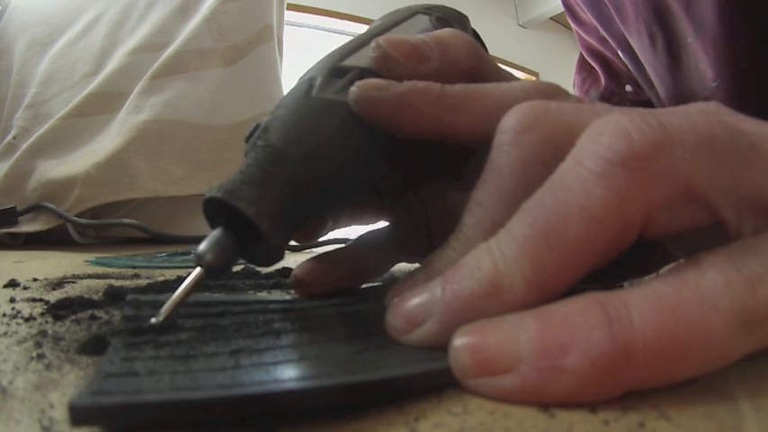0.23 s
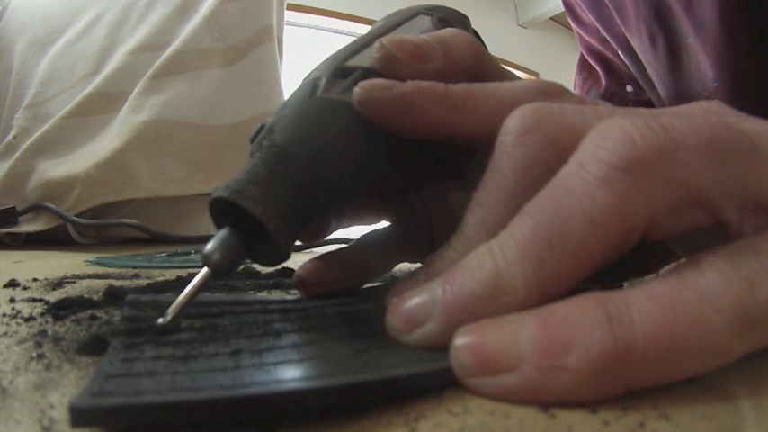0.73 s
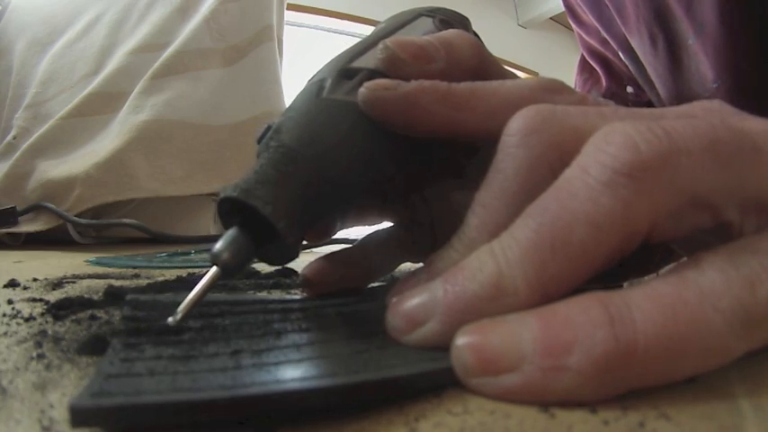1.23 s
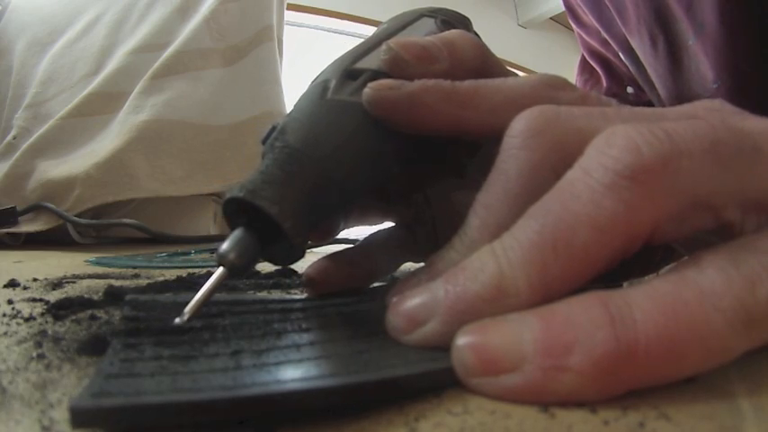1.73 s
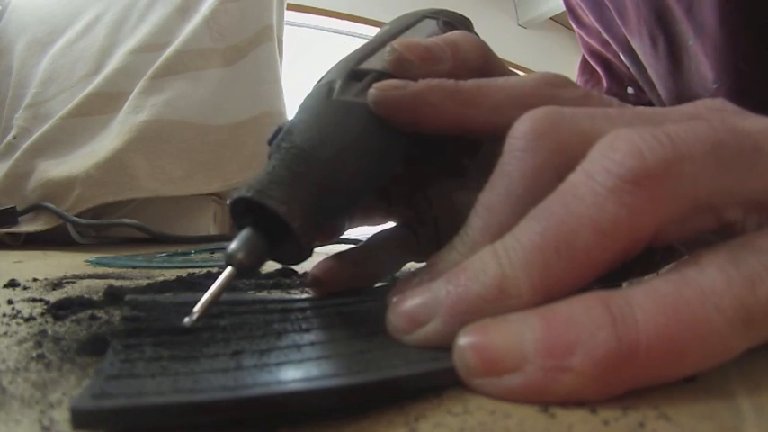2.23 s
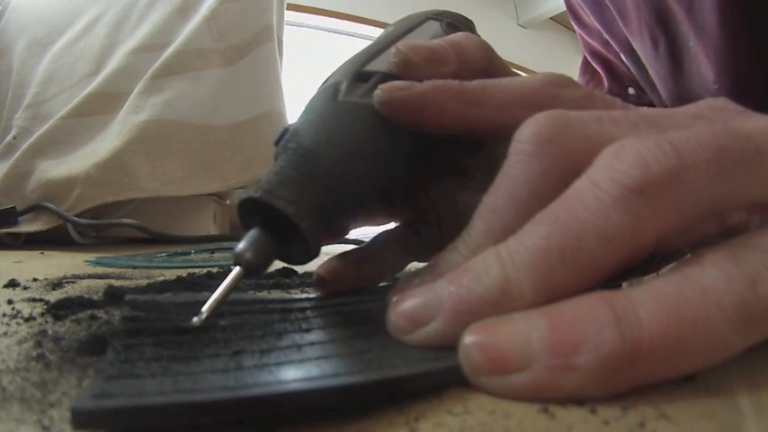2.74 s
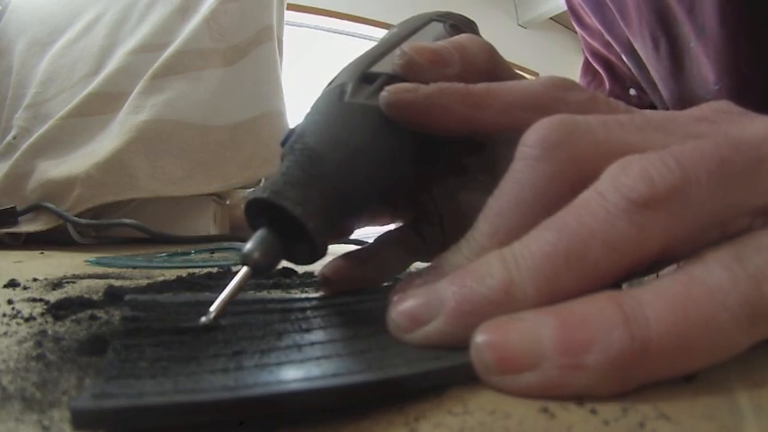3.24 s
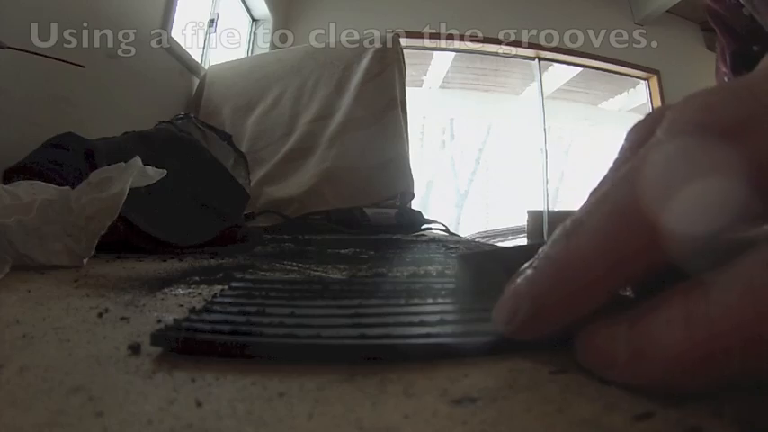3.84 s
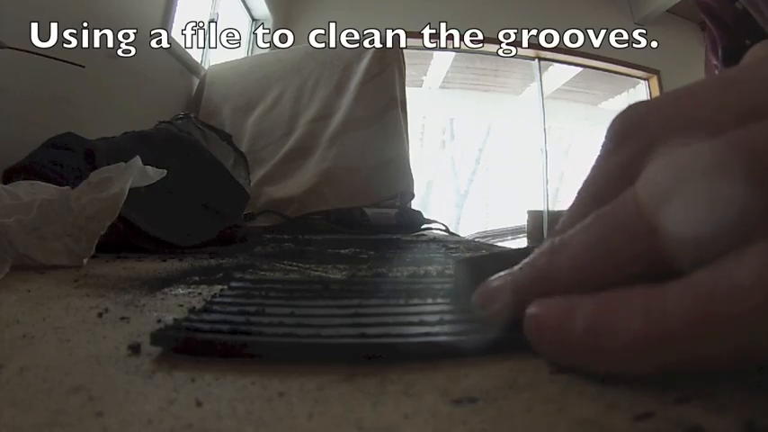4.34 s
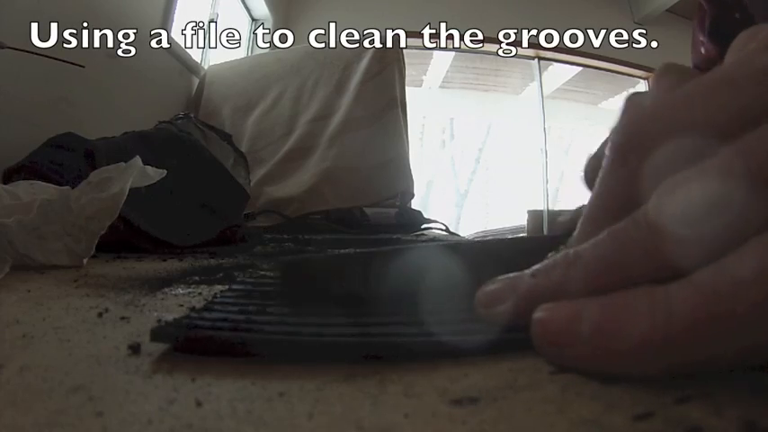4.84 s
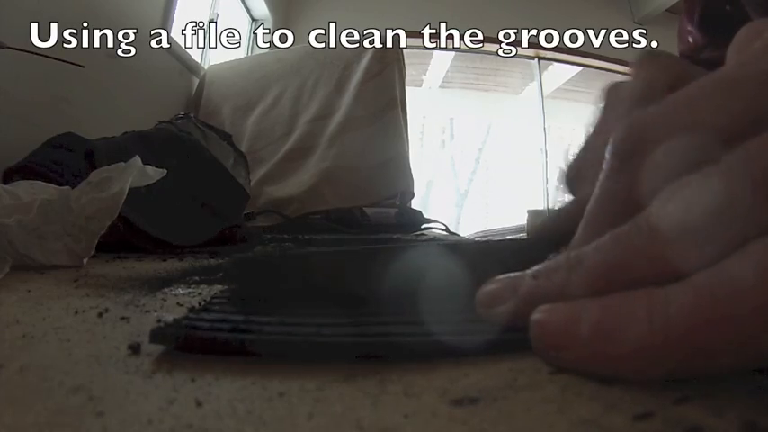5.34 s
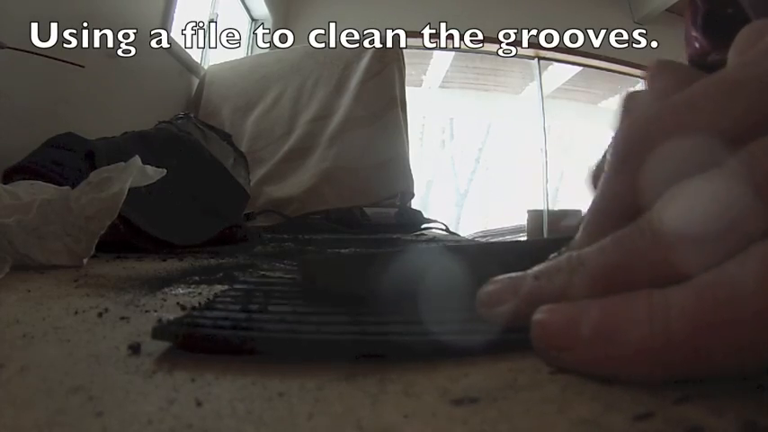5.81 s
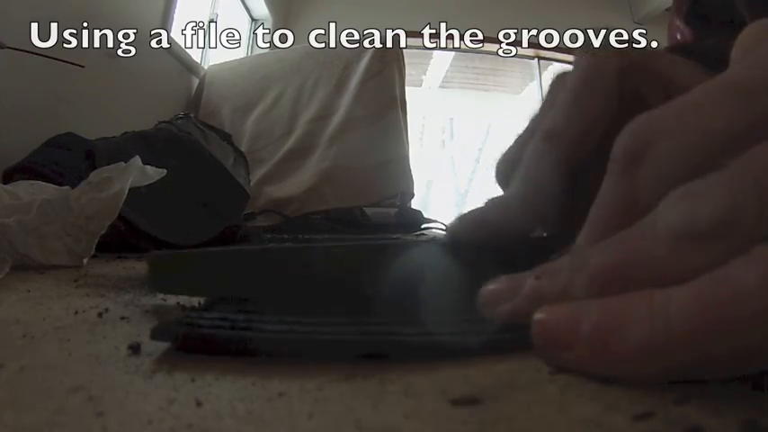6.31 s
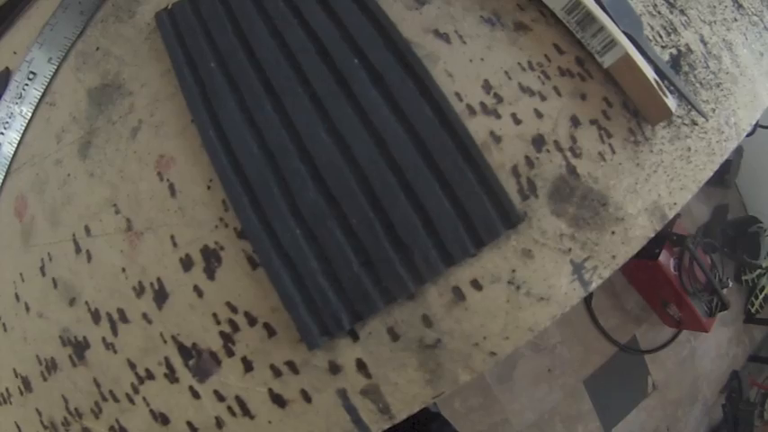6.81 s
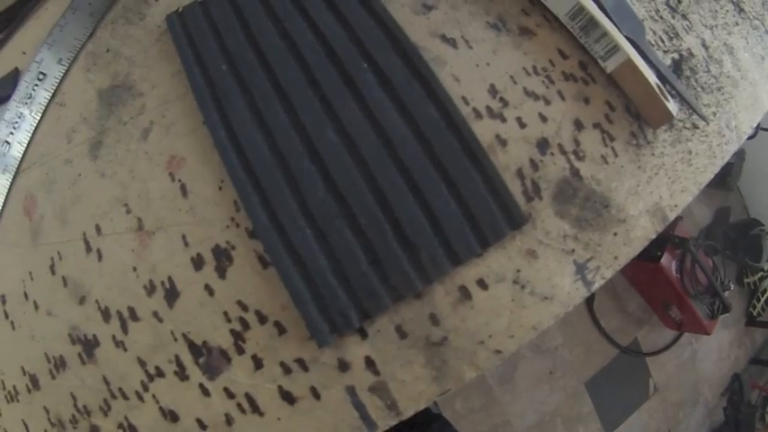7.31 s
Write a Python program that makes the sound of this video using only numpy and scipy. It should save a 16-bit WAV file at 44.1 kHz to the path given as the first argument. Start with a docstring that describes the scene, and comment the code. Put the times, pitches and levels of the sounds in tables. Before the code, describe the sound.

Close up in a quiet workshop, a rotary tool whines steadily as its burr cuts into rubber, sagging a little in pitch as it presses harder. The whine drops away, and light ticks and finger rustles follow. Then a small file rasps back and forth in short, quick strokes that grow somewhat stronger, over dull bench bumps and rumble. The filing ends, leaving only faint room noise in mono.

```python
"""A mains-driven rotary tool grinds a groove in a rubber sheet on a bench, heard close and in mono.
Its shaft, armature slots and fan blades radiate tones that sink in pitch under load, over the noise
of air and burr. After a fade, a small steel file is set down and scrapes to and fro, its teeth
catching the rubber while the hands bump the bench. After another fade the quiet workshop remains."""
import sys
import numpy as np
from scipy import signal
from scipy.fft import rfft, irfft, next_fast_len
from scipy.io import wavfile
from scipy.ndimage import uniform_filter1d, map_coordinates

SR = 44100
rng = np.random.default_rng(int(sys.argv[2]) if len(sys.argv) > 2 else 0)


def unload_audio(sound):
    """Save the sound as a 16-bit wav file, at the path given as the first command line argument."""
    columns = np.transpose(np.atleast_2d(sound))
    # keep every value between -1 and 1, then stretch to whole-number steps
    steps = np.round(np.clip(columns, -1, 1) * 32767)
    wavfile.write(sys.argv[1], SR, steps.astype(np.int16))


N = 333440

# Noise spectra. Each row: frequency in Hz, relative spectral density in dB.
ROOM_SPECTRUM = [(12, -31), (20, 0.5), (59, -1.5), (87, -2), (112, -1.5), (217, -4.5), (1080, -12.5),
                 (4090, -20), (13100, -32.5), (15100, -39)]  # workshop air and hiss
SKIN_SPECTRUM = [(1500, -21), (3000, -6), (4200, 0), (5500, -15), (8000, -8.5), (15500, -23)]  # fingers on rubber
BENCH_SPECTRUM = [(12, -32), (20, 6), (49, 3), (144, -10), (250, -7.5), (320, -27), (550, -120)]  # the bench rumbling
DRUM_SPECTRUM = [(90, -17), (160, -3), (300, 1), (420, 4.5), (650, -27.5), (1500, -90)]  # the sheet drumming
RUBBER_SPECTRUM = [(150, -43), (400, -10), (550, 2.5), (800, 0.5), (1000, -6), (1180, 5), (1300, -7),
                   (1650, -12.5), (1900, -5.5), (2100, -7.5), (2500, -27), (4000, -37), (9000, -80)]  # the sheet scraped on the bench
CREAK_SPECTRUM = [(150, -20), (450, 0), (900, -2), (1400, -8), (3000, -37), (8000, -80)]  # the loaded sheet
GRIT_SPECTRUM = [(1200, -8.5), (2200, -2.5), (2900, -4.5), (3450, -1), (4100, -6), (4650, -3.5),
                 (5500, -9.5), (7240, -9), (11000, -19), (15300, -26)]  # teeth rasping
BITE_SPECTRUM = [(300, -0.5), (900, -1), (1600, 2), (2500, -12), (4500, -21), (8000, -35), (15300, -48)]  # teeth digging in
FAN_SPECTRUM = [(2200, -22.5), (3100, -0.5), (3400, -2.5), (3900, 2), (4500, -5), (5300, -4), (6600, 0.5),
                (7400, -4), (8000, -0.5), (8900, -2.5), (9600, -4.5), (10800, -11.5), (11800, -10.5),
                (15500, -19.5)]  # fan air
BURR_SPECTRUM = [(20, -37), (40, -26.5), (130, -19), (250, -21.5), (500, -15), (800, -11), (1050, -1.5),
                 (1250, -7), (1500, -10.5), (2000, -12), (2500, -13), (3000, -14), (4000, -30)]  # the burr cutting rubber
# Modes of vibration. Each row: frequency in Hz, relative level in dB, t60 in seconds.
SNAP_MODES = [(4320, -5, 0.0065), (7500, -17, .004), (11000, -3, 0.0033)]
SHEET_MODES = [(1000, -4, 0.014), (1560, -8.5, 0.0096)]
FILE_MODES = [(3620, 1.5, 0.031)]
# The file touches down and shifts. Each row: start in seconds, then snap, knock and ring in dB.
FILE_TICKS = [(3.8913, -26, -57, -57), (3.9227, -29, -29.5, -51.5), (4.042, -54, -40, -49),
              (4.0966, -55, -60.5, -61.5), (4.1454, -57, -51, -57), (4.1894, -56.5, -56, -63),
              (4.8994, -39, -36, -44), (5.1194, -43, -26, -54), (5.6585, -38.5, -34.5, -45),
              (5.796, -40.5, -33, -47.5)]
# A hand bumps the bench. Each row: start in seconds, level in dB.
HAND_BUMPS = [(3.9675, -33), (4.034, -36), (4.789, -25.5), (5.084, -28), (5.168, -36), (5.392, -25.5)]
# Fingers brush the sheet. Each row: start and length in seconds, bright and dull levels in dB.
FINGER_BRUSHES = [(3.885, .04, -49, -71), (3.932, 0.035, -64, -61), (4.07, 0.11, -70, -60),
                  (4.19, 0.11, -67, -66), (4.362, 0.11, -73, -50)]
# Push and pull in turn. Each row: start and end in seconds, fastest point as a share of the stroke,
# scrape and hiss in dB, top tooth rate in Hz, first bite in dB.
FILE_STROKES = [(4.396, 4.549, 0.39, -44.5, -52.5, 1100.0, -50), (4.532, 4.67, 0.7, -51, -53, 600.0, -50),
                (4.704, 4.836, 0.72, -39, -44.5, 900.0, -38),
                (4.864, 4.982, 0.12, -40, -45.5, 850.0, -25.5),
                (5.022, 5.141, 0.63, -35.5, -44.5, 1150.0, -45.5),
                (5.176, 5.289, 0.56, -40.5, -48.5, 850.0, -40),
                (5.324, 5.435, 0.53, -36.5, -44, 1100.0, -46),
                (5.469, 5.589, 0.47, -39, -45.5, 750.0, -29.5),
                (5.621, 5.737, 0.52, -34.5, -41, 1180.0, -45),
                (5.775, 5.885, 0.33, -38.5, -43.5, 950.0, -28),
                (5.92, 6.031, 0.45, -33.5, -42, 1100.0, -45), (6.069, 6.175, 0.51, -37, -43.5, 950.0, -34),
                (6.206, 6.312, 0.48, -31.0, -41.0, 1200.0, -36),
                (6.358, 6.461, 0.53, -33.5, -44, 1150.0, -50),
                (6.5, 6.599, 0.55, -32, -40.5, 1200.0, -48.5),
                (6.636, 6.743, 0.62, -36, -44.5, 1050.0, -47), (6.781, 6.9, 0.24, -38, -46, 1050.0, -35)]
# Bench rumble in dB relative to a stroke's hiss: on a push, then on a pull.
ROCKING_DB = [-2, -11]
# The motor under load. Each row: time in seconds, shaft speed in Hz, burr pressure (1 is full).
MOTOR_RUN = [(0.0, 328.4, 0.43), (0.1, 326.3, 0.0), (0.4, 321.1, 0.18), (0.7, 318, .3), (0.85, 317.4, .35),
             (1.15, 318.76, 0.38), (1.45, 318, .45), (1.75, 315.4, 0.66), (1.9, 314.4, 0.56),
             (2.2, 314.13, 0.59), (2.5, 312.4, 0.84), (2.8, 310.2, 0.8), (3.1, 306.79, 0.97),
             (3.25, 305.6, .9), (3.4, 304.86, .85), (3.55, 306.3, 0.94), (3.82, 309.3, 1.06)]
# Strong shaft harmonics. Each row: order, idle and full-load rms in dB, pressure exponent, flutter in dB.
LOADED_ORDERS = [(1, -41, -30, 1.05, 0.7), (2, -49.5, -30, 0.44, 1.77), (3, -45, -32, 2.4, 2.5),
                 (5, -37, -40, 1.05, 2.7)]
# Weaker shaft harmonics. Each row: order, rms in dB.
WEAK_ORDERS = [(4, -41), (6, -46.5), (7, -41.5), (9, -46.5), (10, -40.5), (15, -47), (16, -44.5),
               (17, -45.5), (22, -44.5), (23, -45), (24, -44.5), (30, -52.5), (32, -48)]
# Magnetic sidebands. Each row: shaft order, offset in multiples of THROB_HZ, rms in dB.
THROB_SIDEBANDS = [(1, 1, -42), (2, 1, -48), (15, -1, -53.5), (15, 1, -54), (16, -2, -52.5), (16, -1, -53),
                   (16, 1, -50.5), (16, 2, -47.5), (18, -1, -62.5), (18, 1, -63)]
# Armature slot whine. Each row: offset in multiples of THROB_HZ, relative level in dB.
SLOT_SIDEBANDS = [(-3, -7), (-2, -1), (-1, 3), (0, 0.0), (1, 1.8), (2, -0.5), (3, -12.5)]
# Strength of a whine by its pitch. Each row: frequency in Hz, level in dB.
HOUSING_RESPONSE = [(2000, -47.5), (2150, -41), (2300, -31), (2375, -27.5), (2525, -26.5), (2600, -27),
                    (2750, -36.5), (2900, -56.5), (3100, -64)]
COWL_RESPONSE = [(5450, -34.5), (5560, -30), (5660, -26.5), (5750, -29), (5950, -28.5)]
# Tool out, filing in, filing out, quiet room in. Each row: start and end in seconds.
FADE_SPANS = [(3.721, 3.821), (3.815, 3.94), (6.79, 6.86), (6.86, 6.95)]

THROB_HZ, SLOTS, FAN_BLADES = 120, 8, 18  # the magnetic pull throbs at twice the mains frequency
FAINT_DB, FALL_DB, SCATTER_DB = -44, 0.3, -1.5  # unlisted orders: base level, loss per order, spread
BURR_DB, AIR_DB, AIR_SAG_DB = -26, -26, 2.5  # the air sags by this much at full pressure
JERK_SPEED, JERK_S = .14, .003  # the file breaks free with a jump in speed
DRUM_DB, REST_DB = -50.5, [-52, -58.5]  # drumming in a stroke; steady rumble and drumming after LEAN_S
LEAN_S = 4.75  # both hands lean on the work from here
SHUDDER_DB, SHUDDER_T60_S = -20, .12  # drumming after a bump, relative to the bump
FIZZ_HZ, FIZZ_POWER = 7000, 0.22  # the treble above this grows faster than the hiss
TOP_HZ, EDGE_HZ = 15300, 150


def amp(db):
    """Amplitude ratio of a level in decibels."""
    return 10 ** (np.asarray(db) / 20)


def unit(x):
    """Normalisation to rms 1."""
    return x / np.sqrt(np.mean(x ** 2) + 1e-20)


def along(points, hz):
    """Interpolation of (Hz, value) points on a logarithmic frequency axis."""
    freqs, values = np.transpose(points)
    return np.interp(np.log(hz + 1), np.log(freqs + 1), values)


def wobble(knot_hz):
    """Smooth random modulation: a spline through Gaussian knots."""
    knots = rng.standard_normal(int(N * knot_hz / SR) + 4)
    return map_coordinates(knots, [np.arange(N) * knot_hz / SR])


def filtered(x, response):
    """Linear filtering: the spectrum is multiplied by a frequency response."""
    size = next_fast_len(N + SR // 2)
    return irfft(rfft(x, size) * response(np.fft.rfftfreq(size, 1 / SR)), size)[..., :N]


def noise(spectrum, grain_db=0, grain_hz=300):
    """Coloured noise of rms 1, made grainy by amplitude modulation."""
    grains = amp(grain_db * wobble(grain_hz)) * rng.standard_normal(N)
    return unit(filtered(grains, lambda hz: amp(along(spectrum, hz))))


def ring(modes, t):
    """Free vibration: damped modes, excited at new strengths by each blow."""
    return sum(amp(db + rng.normal(0, 1.8) - 60 * t / t60) * np.sin(2 * np.pi * hz * t)
               for hz, db, t60 in modes)


def echoes(x, t60, wet_db):
    """Reverberation: reflections from near walls add an exponentially decaying tail."""
    t = np.arange(SR // 5) / SR
    tail = amp(-60 * t / t60) * rng.standard_normal(len(t))
    return x + amp(wet_db) * signal.fftconvolve(x, tail / np.linalg.norm(tail))[:N]


def workshop():
    """Ambient noise, its density falling toward the treble."""
    return amp(-64) * noise(ROOM_SPECTRUM, grain_db=.7, grain_hz=30)


def fingers():
    """Sliding friction of skin on rubber gives a bright and a dull rustle."""
    t = np.arange(N) / SR
    bright, dull = np.zeros((2, N))
    for start, length, bright_db, dull_db in FINGER_BRUSHES:
        sweep = np.interp(t, start + length * np.array([0, .2, .7, 1.3]), [0, .9, .8, .0049])
        bright += amp(bright_db) * sweep
        dull += amp(dull_db) * sweep
    return (bright * noise(SKIN_SPECTRUM, grain_db=3, grain_hz=320)
            + dull * noise(BITE_SPECTRUM, grain_db=6.5, grain_hz=60))


def bumps():
    """A soft impact gives one slow push and release, and sets the sheet drumming."""
    t = np.arange(SR // 20) / SR
    pulses, shudder = np.zeros((2, N))
    u = (t - .006) / .001  # time from the pulse centre, in pulse widths
    for start, db in HAND_BUMPS:
        pulses[round(start * SR):][:len(t)] -= amp(db) * u * np.exp(-u * u / 2)
        decay = amp(db + SHUDDER_DB - 60 * t / SHUDDER_T60_S)
        shudder[round(start * SR):][:len(t)] += decay * np.minimum(t / .008, 1)
    return pulses + shudder * noise(DRUM_SPECTRUM, grain_db=4.5, grain_hz=60)


def ticks():
    """A hard impact excites the modes of the contact, the sheet and the steel file."""
    t = np.arange(SR // 20) / SR
    out = np.zeros(N)
    for start, snap_db, knock_db, ring_db in FILE_TICKS:
        crack = .9 * amp(-60 * t / .003) * uniform_filter1d(rng.standard_normal(len(t)), size=3)
        snap = amp(snap_db) * (ring(SNAP_MODES, t) + crack)
        knock = amp(knock_db) * ring(SHEET_MODES, t)
        out[round(start * SR):][:len(t)] += snap + knock + amp(ring_db) * ring(FILE_MODES, t)
    return out


def filing():
    """Friction: teeth catch the rubber at a rate that rises with speed, shaking sheet and bench."""
    t = np.arange(N) / SR
    scrape, hiss, bite = np.zeros((3, N))
    tooth_hz = np.full(N, 500.)
    rock, drum = amp(REST_DB)[:, None] * (t > LEAN_S)
    for k, (start, end, fastest, scrape_db, hiss_db, top_hz, bite_db) in enumerate(FILE_STROKES):
        times = [start, start + JERK_S, start + fastest * (end - start), end]
        speed = np.sin(np.pi / 2 * np.interp(t, times, [0, JERK_SPEED, 1, 0]))
        scrape += amp(scrape_db) * speed ** 0.89
        hiss += amp(hiss_db) * speed ** 0.88
        rock += amp(hiss_db + ROCKING_DB[k % 2]) * speed ** 1.5
        drum += amp(DRUM_DB) * speed ** 0.48
        tooth_hz += (top_hz - 500) * speed
        bite_age = np.maximum(t - start, 0) / 0.012
        bite += amp(bite_db) * bite_age * np.exp(-bite_age)
    # uneven catching blurs the tooth tone and breaks it into bursts
    phase = 2 * np.pi * np.cumsum(tooth_hz * (1 + .09 * wobble(200))) / SR
    teeth = (np.cos(phase) + .4 * np.cos(2 * phase)) * amp(4 * wobble(80))
    teeth = unit(filtered(teeth, lambda hz: amp(0.36 * along(RUBBER_SPECTRUM, hz))))
    body = amp(-3.5) * (teeth + noise(RUBBER_SPECTRUM, grain_db=3, grain_hz=120))
    creak = amp(-55) * noise(CREAK_SPECTRUM) + amp(-62) * noise(GRIT_SPECTRUM)
    creak *= t > FILE_STROKES[0][0]  # the file stays pressed down between strokes
    flare = amp(1.2 * wobble(70)) * (1 + 0.37 * np.cos(phase))  # the grit flares at each tooth
    grit = noise(GRIT_SPECTRUM, grain_db=1, grain_hz=600)
    dull = filtered(grit, lambda hz: 1 / (1 + (hz / FIZZ_HZ) ** 4))
    fizz = (hiss / hiss.max()) ** FIZZ_POWER * (grit - dull)
    rasp = hiss * flare * (dull + fizz) + bite * noise(BITE_SPECTRUM, grain_db=2, grain_hz=210)
    shake = rock * noise(BENCH_SPECTRUM, grain_db=4, grain_hz=28)
    shake += drum * noise(DRUM_SPECTRUM, grain_db=4, grain_hz=45)
    scraping = echoes(scrape * body, t60=0.2, wet_db=-9.5)
    return scraping + echoes(rasp, t60=0.13, wet_db=-13) + creak + shake


def motor_tones(shaft_hz, pressure, shaft_phase, throb_phase):
    """Periodic forces radiate shaft harmonics; modulation by the magnetic pull adds sidebands."""
    def tone(order, db, flutter_db, flutter_hz=12, side=0):
        """One partial with a fluttering level."""
        phase = order * (shaft_phase + order) + side * throb_phase
        return np.sqrt(2) * amp(db + flutter_db * wobble(flutter_hz)) * np.cos(phase)

    tones = np.zeros(N)
    for order, idle_db, full_db, power, flutter_db in LOADED_ORDERS:
        tones += tone(order, idle_db + (full_db - idle_db) * pressure ** power, flutter_db, flutter_hz=7)
    blade_db = along(COWL_RESPONSE, FAN_BLADES * shaft_hz)
    tones += tone(FAN_BLADES, blade_db, flutter_db=0.45, flutter_hz=8)
    tones += tone(2 * FAN_BLADES, blade_db - 19.5, flutter_db=1.5, flutter_hz=5)
    listed = [row[0] for row in LOADED_ORDERS + WEAK_ORDERS] + [SLOTS, FAN_BLADES, 2 * FAN_BLADES]
    faint = [(order, FAINT_DB - FALL_DB * order + SCATTER_DB * rng.standard_normal())
             for order in range(1, 49) if order not in listed]
    tones += sum(tone(order, db, flutter_db=2.5, flutter_hz=6) for order, db in WEAK_ORDERS + faint)
    tones += sum(tone(order, db, flutter_db=-1.5, side=side) for order, side, db in THROB_SIDEBANDS)
    for side, db in SLOT_SIDEBANDS:  # the housing resonance weights each tone at its present pitch
        housing_db = along(HOUSING_RESPONSE, SLOTS * shaft_hz + side * THROB_HZ)
        tones += tone(SLOTS, db + housing_db, flutter_db=0.22, side=side)
    return tones


def rotary_tool():
    """Rotation drives the motor tones and modulates the broadband noise of burr and fan."""
    t = np.arange(N) / SR
    times, speeds, pressures = np.transpose(MOTOR_RUN)
    shaft_hz, pressure = np.interp(t, times, speeds), np.interp(t, times, pressures)
    shaft_phase = 2 * np.pi * np.cumsum(shaft_hz) / SR
    throb_phase = 2 * np.pi * THROB_HZ * t + 0.66
    tones = motor_tones(shaft_hz, pressure, shaft_phase, throb_phase)
    burr = amp(BURR_DB + 0.56 * wobble(6)) * noise(BURR_SPECTRUM, grain_db=.5, grain_hz=150)
    burr *= 1 + .04 * np.cos(throb_phase) + .049 * np.cos(shaft_phase)
    air = amp(AIR_DB - AIR_SAG_DB * pressure) * noise(FAN_SPECTRUM, grain_db=.5, grain_hz=110)
    air *= 1 + .03 * np.cos(shaft_phase)
    return tones + burr + air


def scene():
    """Superposition of three scenes under fades: grinding, filing, the quiet workshop."""
    t = np.arange(N) / SR
    tool_out, file_in, file_out, room_in = [np.interp(t, span, [0, 1]) for span in FADE_SPANS]
    room = workshop()
    grinding = rotary_tool()
    handwork = filing() + ticks() + bumps() + fingers() + amp(4.5) * room
    mono = (1 - tool_out) * grinding + file_in * (1 - file_out) * handwork + room_in * room
    return np.array([mono, mono])


def record(dry):
    """Band limiting: a low-pass with a raised-cosine edge passes nothing above TOP_HZ."""
    return filtered(dry, lambda hz: np.sin(np.pi / 2 * np.clip((TOP_HZ - hz) / EDGE_HZ, 0, 1)) ** 2)


dry = scene()
out = record(dry)
unload_audio(out)
```